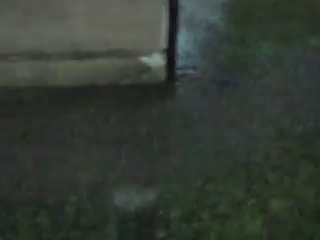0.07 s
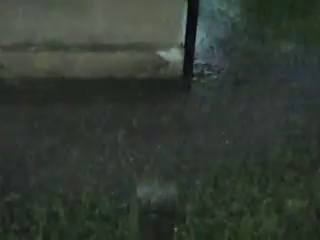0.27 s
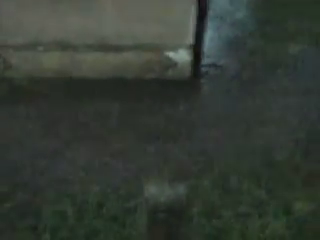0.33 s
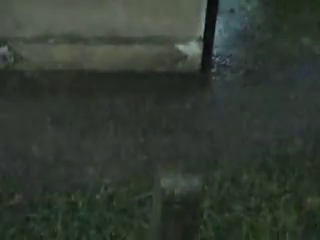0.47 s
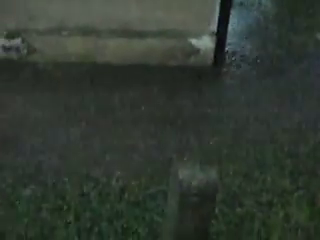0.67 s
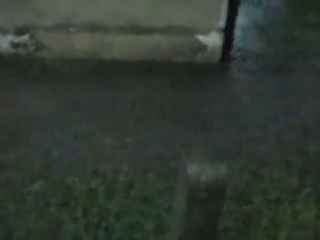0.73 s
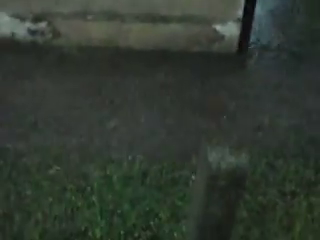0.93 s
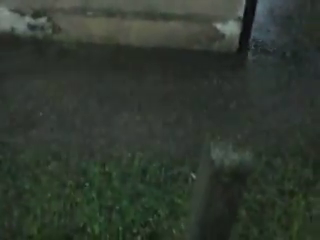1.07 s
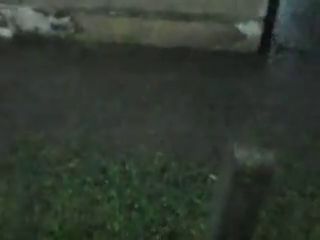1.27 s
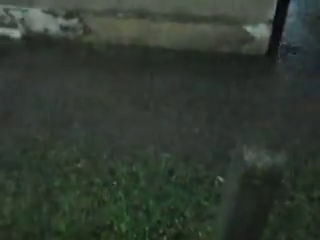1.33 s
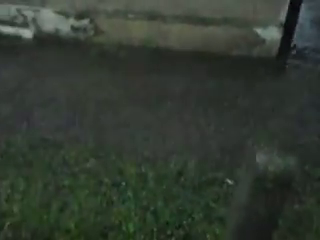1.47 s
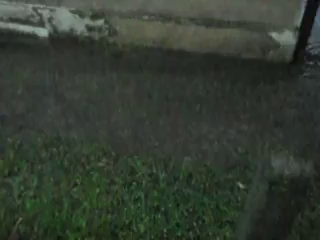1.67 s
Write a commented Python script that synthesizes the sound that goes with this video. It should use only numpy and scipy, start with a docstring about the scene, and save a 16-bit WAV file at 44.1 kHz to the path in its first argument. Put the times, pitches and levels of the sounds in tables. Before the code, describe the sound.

Steady rain hisses and patters on wet ground and grass, with single drops ticking close by. One drop hits the small camera microphone with a loud, sharp pop, after which the rain is quieter and more drips follow.

```python
"""Steady rain on wet ground and grass, with single drops landing close by.
It is heard through a small camera microphone whose port rings near 3.7 kHz; a hand bumps
the camera softly at the start. One drop hits the microphone itself: the pop overloads the
recorder, whose gain control turns the rain down and then creeps back up."""
import sys
import numpy as np
from scipy import signal
from scipy.fft import rfft, irfft
from scipy.io import wavfile
from scipy.ndimage import uniform_filter1d, minimum_filter1d

SR = 44100
rng = np.random.default_rng(int(sys.argv[2]) if len(sys.argv) > 2 else 0)


def wrap_up_sound(samples):
    """Save the sound to the file named by the first command line argument, as 16-bit audio."""
    columns = np.atleast_2d(samples).T
    # keep every value between -1 and 1, then stretch to whole-number steps
    tamed = np.clip(columns, -1, 1)
    steps = np.round(tamed * 32767).astype(np.int16)
    wavfile.write(sys.argv[1], SR, steps)


N = 74970

# Response of the microphone port. Each row: frequency in Hz, gain in dB.
PORT_RESPONSE = [(20, -22), (1500, -28.5), (2400, -18.5), (3000, -10), (3400, -2.5), (3690, 3), (3850, -1),
                 (4000, -14), (4220, -10.5), (4380, -23.5), (4520, -41), (4700, -61.5), (5200, -79.5)]
DROP_LOW_CUT_HZ = 554


def near_drops(t):
    """Close by, each drop ticks, ticks again as the water falls back, splashes and rings the ground."""
    # Each row: start in seconds, tick in dB, rebound delay in seconds, rebound in dB relative to
    # the tick, splash in dB, hollow plop in dB.
    drops = [(.038, -40, .00108, -12.5, -51, -32.5), (.070, -13, .00108, -14, -45.5, -25),
             (.1330, -13, .00108, -4.5, -41, -58.5), (.163, -25, .00108, -4.5, -24.5, -28.5),
             (.2335, -13, .00081, -3.5, -20.5, -31), (0.75, -3.5, .00108, -0.5, -14, -54),
             (.963, -12, .00081, -5, -14, -51), (1.052, -26.5, .00108, -11.5, -25.5, -24.5),
             (1.141, -28, .00108, -9, -29, -26), (1.2462, -11.5, .00108, -6, -30.5, -57.5),
             (1.263, -15.5, .00108, -3.5, -37, -56), (1.3225, -3, .00135, -6.5, -30.5, -51.5),
             (1.3883, -0.5, .00163, -7, -17.5, -16), (1.4463, 4, .00027, -5, -16.5, -44.5),
             (1.5134, -4, .00163, -4, -14, -53), (1.657, -14.5, .00108, -6, -36.5, -51.5)]
    # Ring of soaked ground. Each row: frequency in Hz, dB relative to the plop, seconds to fall 60 dB.
    ground_modes = [(462, -2, 0.066), (712, -2.5, 0.02), (1080, -2.5, .012), (1500, -5, .005)]
    detunes = 1 + 0.015 * rng.standard_normal((len(drops), 2))
    ticks, body = np.zeros(N), np.zeros(N)
    for drop, (splash_tune, plop_tune) in zip(drops, detunes):
        start, tick_db, delay, rebound_db, splash_db, plop_db = drop
        hit = int(start * SR)
        ticks[hit] += undb(tick_db)
        ticks[hit + round(delay * SR)] += undb(tick_db + rebound_db)
        body += undb(splash_db) * ring(t - start, hz=2090 * splash_tune, t60=0.0066)
        for hz, db, t60 in ground_modes:
            body += undb(plop_db + db) * ring(t - start, hz * plop_tune, t60)
    body = colour(body, PORT_RESPONSE) / undb(PORT_RESPONSE[0][1])  # unity gain at the bass end
    return cut(port_ring(ticks) + body, "high", DROP_LOW_CUT_HZ)


def port_ring(ticks):
    """Ticks ring the microphone port; a tick of size 1 peaks at 1."""
    unit_peak = colour(signal.unit_impulse(N, "mid"), PORT_RESPONSE).max()
    return colour(ticks, PORT_RESPONSE) / unit_peak


def microphone_pop(t):
    """A drop cracks on the port and pushes the diaphragm, which springs back as the pressure leaks away."""
    hit_s, push_s, edge_s, spring_back_db = .67515, .00186, .00009, 1.4
    crack_hz, crack_lead_s, crack_width_s = 3150, .00012, .00034
    pop_db, crack_db, leak_hz = 18, -5.5, 132

    def step(at_s):
        return .5 + .5 * np.tanh(2 * (t - at_s) / edge_s)

    age = t - (hit_s - crack_lead_s)
    crack = np.cos(2 * np.pi * crack_hz * age) * np.exp(-(age / crack_width_s) ** 2)
    push = step(hit_s) - undb(spring_back_db) * step(hit_s + push_s)
    return undb(pop_db) * (undb(crack_db) * crack - cut(push, "high", leak_hz))


def patter():
    """All around, small drops tick at random, most weak and a few strong."""
    drops_per_s, spread_db = 1400, 3
    when, strength = rng.random((int(drops_per_s * N / SR), 2)).T
    size = undb(spread_db * np.minimum(-np.log(1 - strength), 5))
    ticks = np.bincount((when * N).astype(int), size, N)
    ringing = colour(ticks - ticks.mean(), PORT_RESPONSE)
    return level(cut(ringing, "high", DROP_LOW_CUT_HZ), db=-33.5)


def far_rain():
    """Farther off, countless drops merge into a hiss that flickers a little."""
    # Spectrum of the hiss. Each row: frequency in Hz, relative density in dB.
    hiss_spectrum = [(20, -17), (60, -8.5), (150, -3.5), (350, -4), (700, -4.5), (1500, 6), (2400, 0),
                     (3200, -5), (4500, -5.5)]
    flicker_db = 1.0
    hiss = colour(rng.standard_normal(N), hiss_spectrum)
    return level(colour(hiss, PORT_RESPONSE), db=-30) * undb(flicker_db * walk(rate=45))


def handling(t):
    """The hand shifts on the camera: short dull bumps."""
    # Each row: centre of the bump in seconds, level in dB.
    bumps = [(0.038, -41), (.108, -46.5), (.130, -50)]
    width_s = 0.013
    rumble = level(cut(rng.standard_normal(N), "low", hz=320), db=0)
    return rumble * sum(undb(db) * np.exp(-((t - centre) / width_s) ** 2) for centre, db in bumps)


def undb(db):
    return 10 ** (np.asarray(db) / 20)


def level(x, db):
    """Scale to an rms level."""
    return x * undb(db) / np.sqrt(np.mean(x ** 2))


def cut(x, passes, hz):
    """Second-order filter that passes the "low" or the "high" side."""
    return signal.sosfilt(signal.butter(2, hz, passes, fs=SR, output="sos"), x)


def colour(x, points):
    """Filter by a curve of (Hz, dB) points."""
    hz, db = np.array(points, float).T
    bin_hz = np.maximum(np.fft.rfftfreq(2 * N, 1 / SR), 1)
    gain = undb(np.interp(np.log(bin_hz), np.log(hz), db))
    return irfft(rfft(x, 2 * N) * gain)[:N]


def walk(rate):
    """Random levels held 1 / rate s and smoothed twice; spread of 1."""
    hold = int(SR / rate)
    steps = np.repeat(rng.standard_normal(N // hold + 1), hold)
    smooth = uniform_filter1d(uniform_filter1d(steps, hold), hold)[:N]
    return smooth / smooth.std()


def ring(age, hz, t60):
    """A damped sine that starts at age 0."""
    age = np.maximum(age, 0)
    return np.sin(2 * np.pi * hz * age) * np.exp(-np.log(1000) * age / t60)


def scene():
    """Rain near and far, at one hand-held microphone over wet ground."""
    # Strength of the shower. Each row: time in seconds, gain in dB.
    shower = [(0, -.5), (.3, -0.5), (.65, 0.5), (.85, 0), (1.1, 1.5), (1.35, 2), (1.55, -1.5), (1.7, 0)]
    t = np.arange(N) / SR
    swell = undb(np.interp(t, *np.array(shower).T))
    rain = (far_rain() + patter()) * swell
    return (rain + near_drops(t) + microphone_pop(t) + handling(t))[None]


def record(dry):
    """Gain control ducks at once on a peak and recovers slowly; what is still too loud clips."""
    # The recorder's faint steady noise. Each row: frequency in Hz, relative density in dB.
    self_noise = [(20, 3.5), (100, -2.5), (300, -1), (1000, -1), (4200, -16), (4700, -53.5), (5200, -72)]
    limit_db, start_duck_db, recover_db_per_s, lookahead_s = 3.5, 4, 3.5, .001
    clip_level, top_hz = .71, 15800
    recovery_db = recover_db_per_s * np.arange(N) / SR
    over_db = np.maximum(20 * np.log10(np.abs(dry[0]) + 1e-9) - limit_db, 0)
    duck_db = np.maximum.accumulate(np.maximum(over_db + recovery_db, start_duck_db)) - recovery_db
    gain = minimum_filter1d(undb(-duck_db), 2 * int(lookahead_s * SR) + 1)
    clipped = np.clip(dry * gain, -clip_level, clip_level)
    noisy = clipped + level(colour(rng.standard_normal(N), self_noise), db=-58.5)
    dull = cut(noisy, "low", hz=8500)
    return signal.sosfilt(signal.ellip(8, .2, 70, top_hz, fs=SR, output="sos"), dull)


dry = scene()
out = record(dry)
wrap_up_sound(out)
```